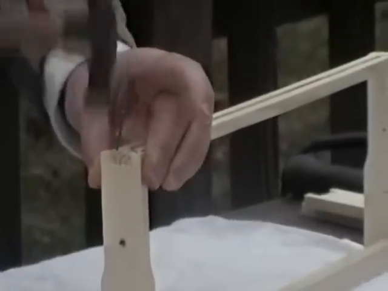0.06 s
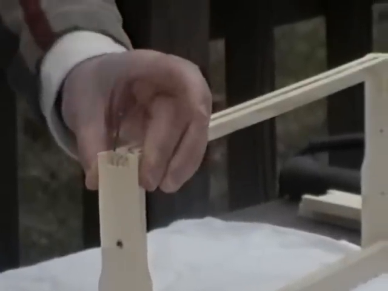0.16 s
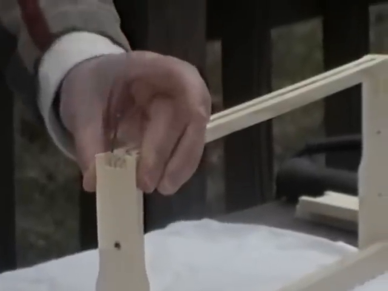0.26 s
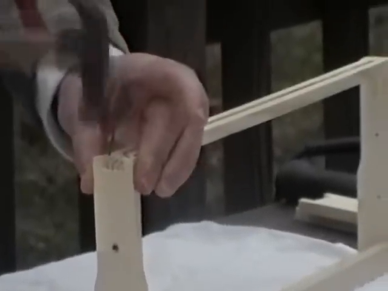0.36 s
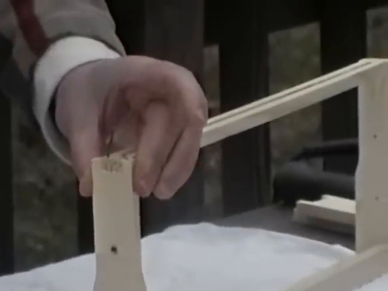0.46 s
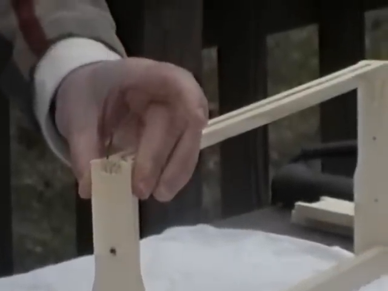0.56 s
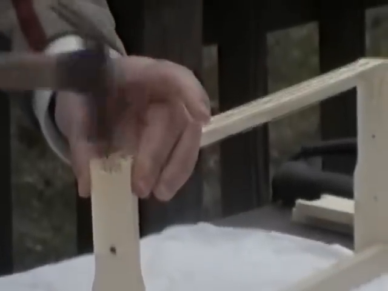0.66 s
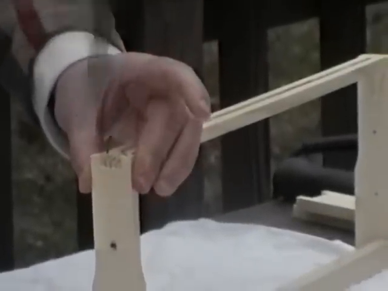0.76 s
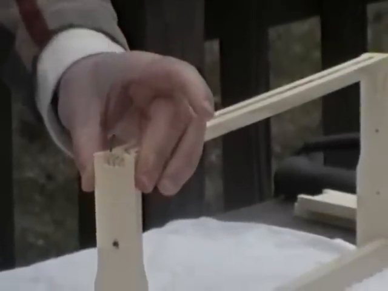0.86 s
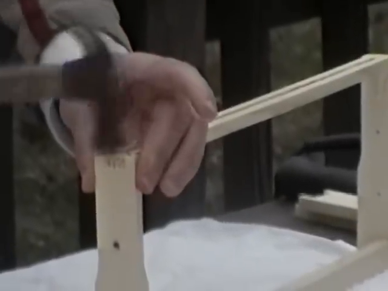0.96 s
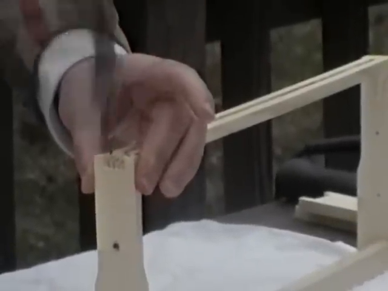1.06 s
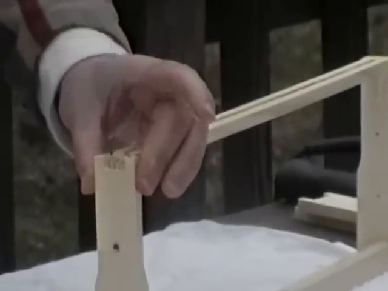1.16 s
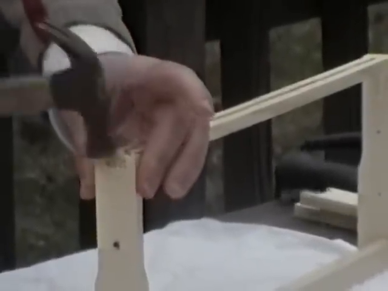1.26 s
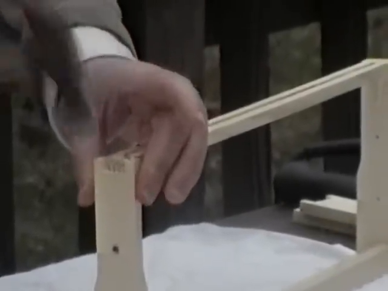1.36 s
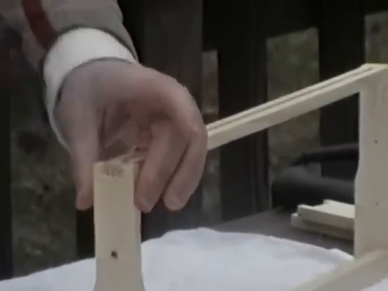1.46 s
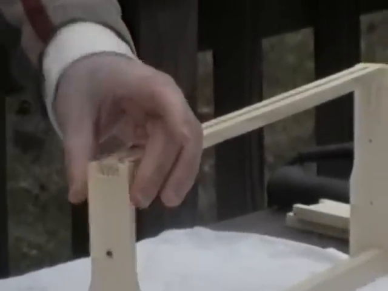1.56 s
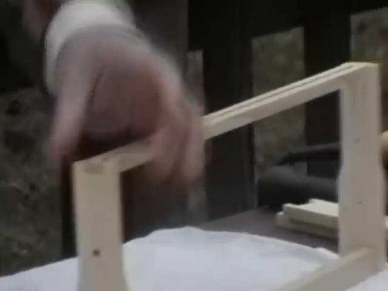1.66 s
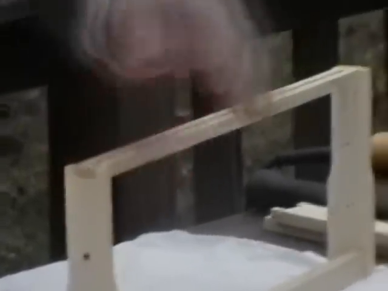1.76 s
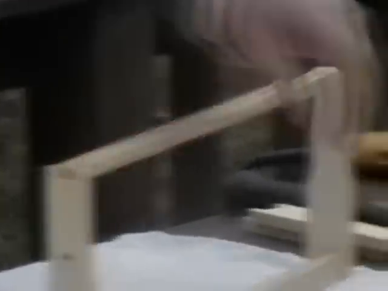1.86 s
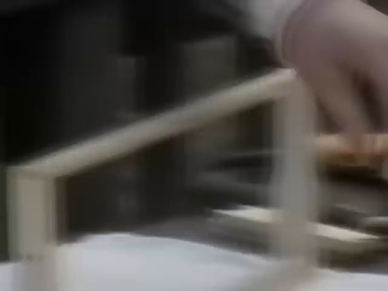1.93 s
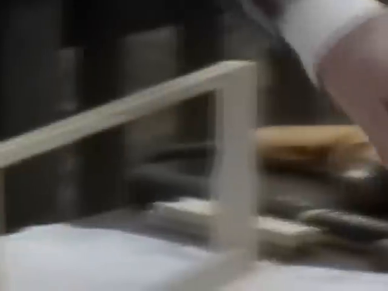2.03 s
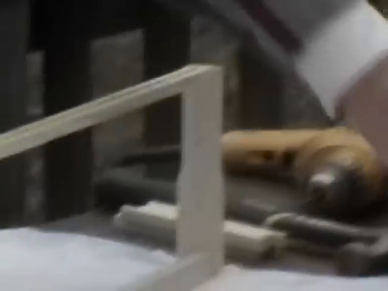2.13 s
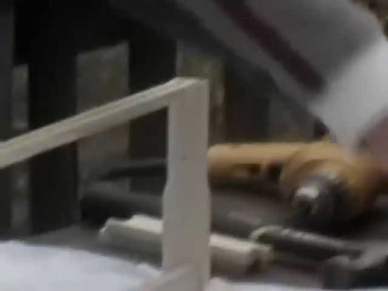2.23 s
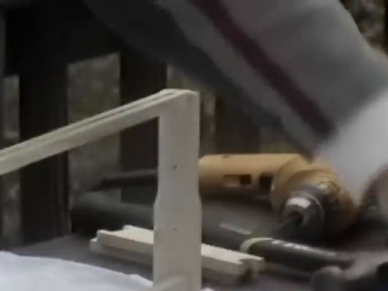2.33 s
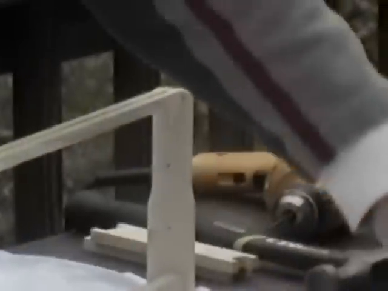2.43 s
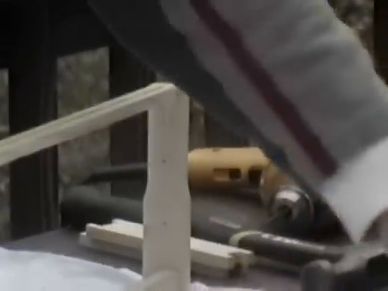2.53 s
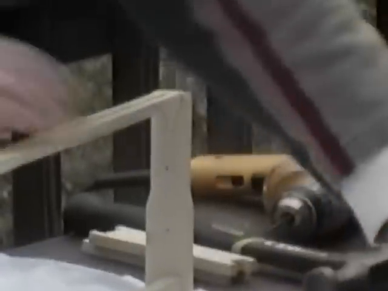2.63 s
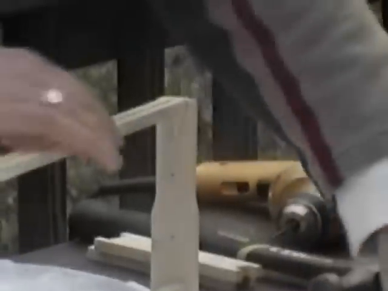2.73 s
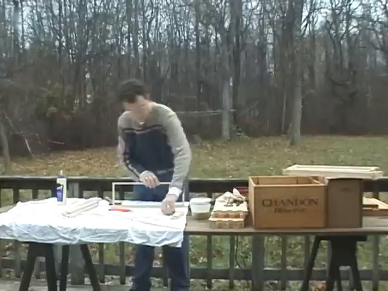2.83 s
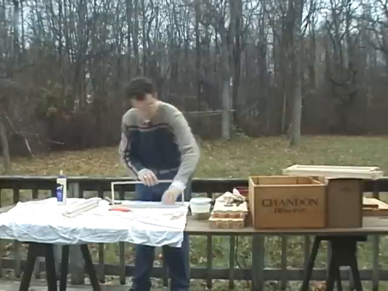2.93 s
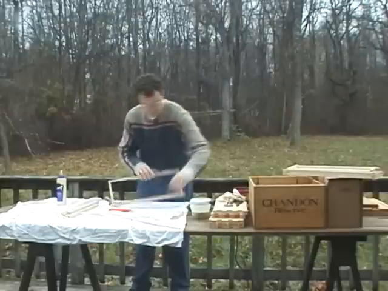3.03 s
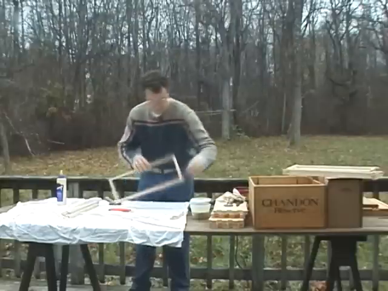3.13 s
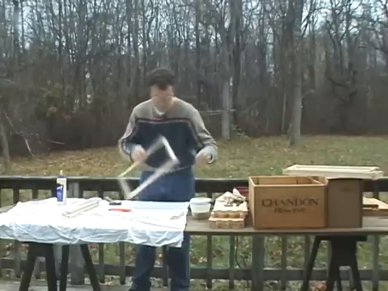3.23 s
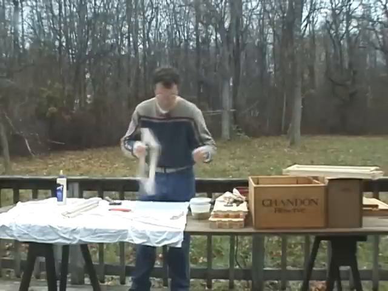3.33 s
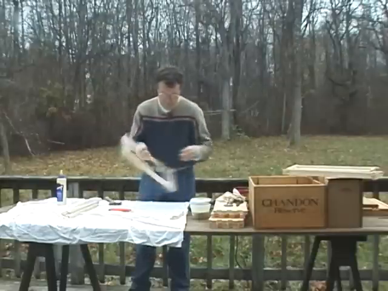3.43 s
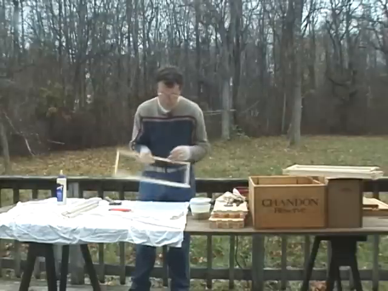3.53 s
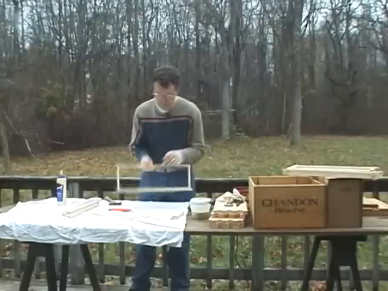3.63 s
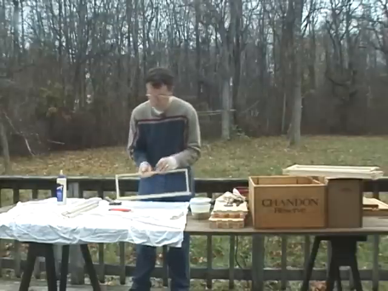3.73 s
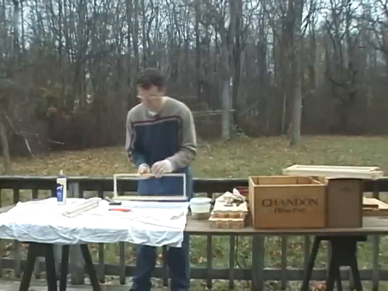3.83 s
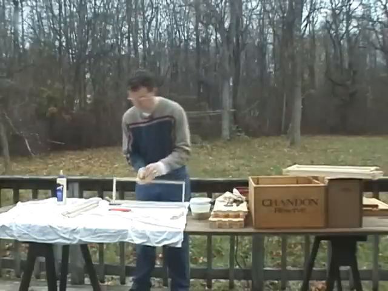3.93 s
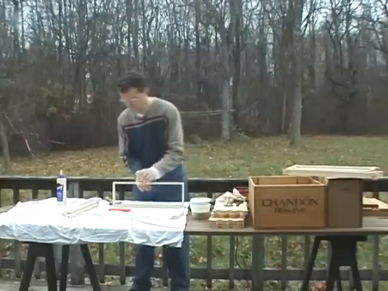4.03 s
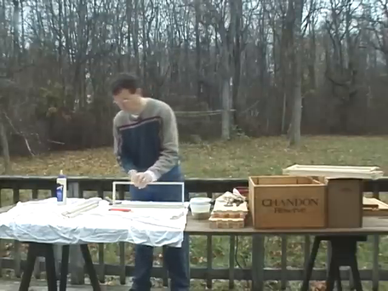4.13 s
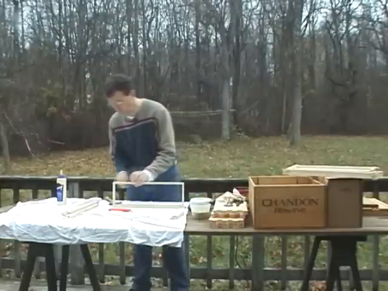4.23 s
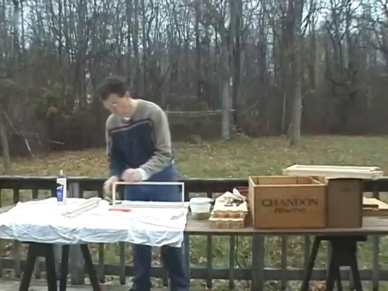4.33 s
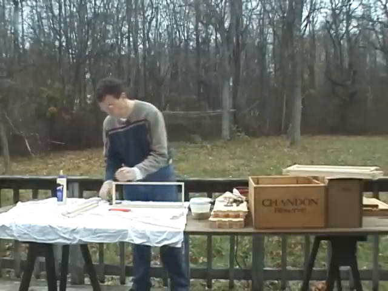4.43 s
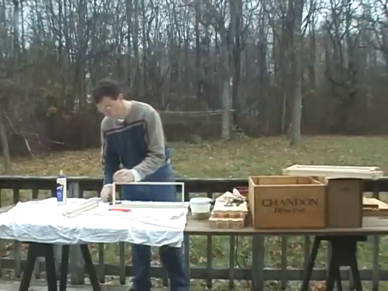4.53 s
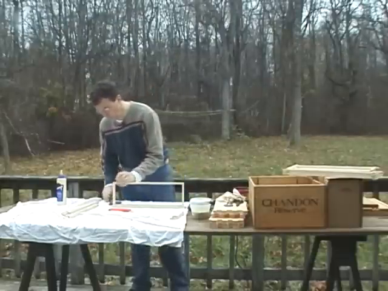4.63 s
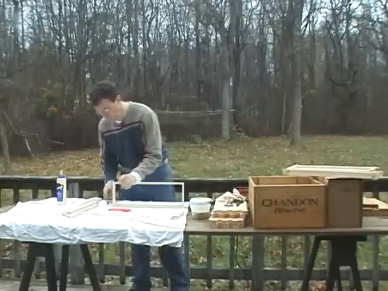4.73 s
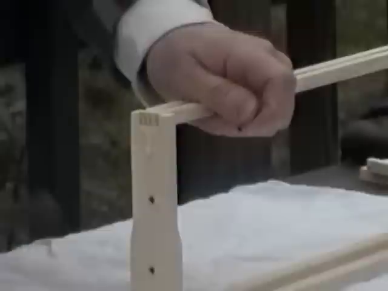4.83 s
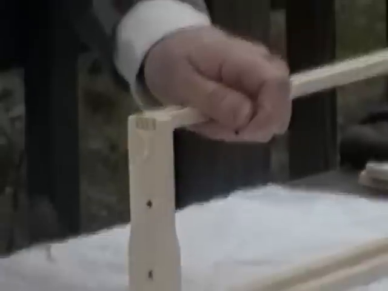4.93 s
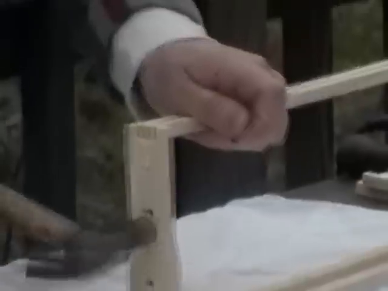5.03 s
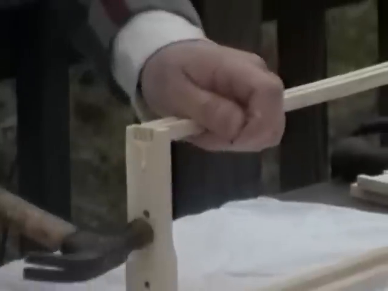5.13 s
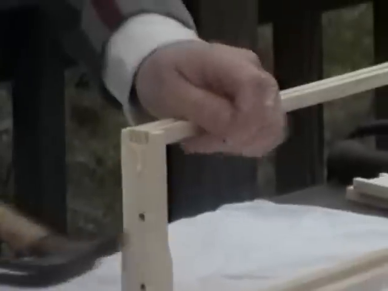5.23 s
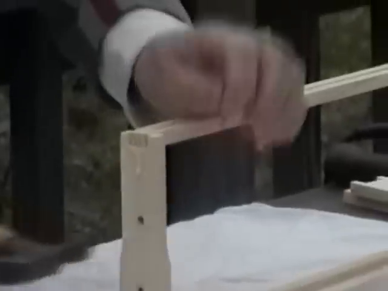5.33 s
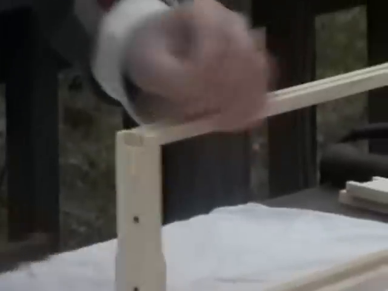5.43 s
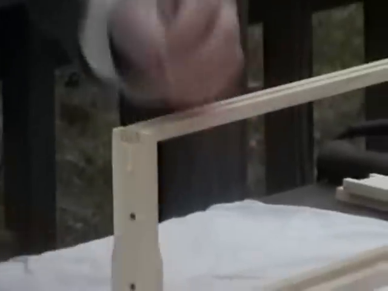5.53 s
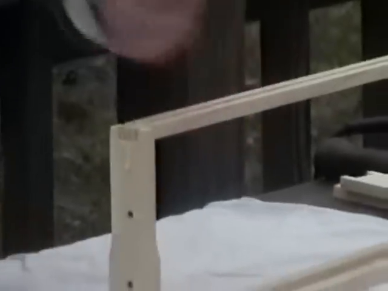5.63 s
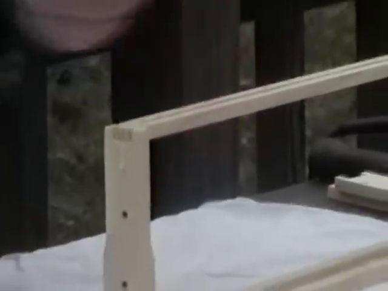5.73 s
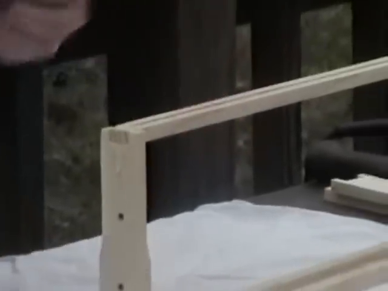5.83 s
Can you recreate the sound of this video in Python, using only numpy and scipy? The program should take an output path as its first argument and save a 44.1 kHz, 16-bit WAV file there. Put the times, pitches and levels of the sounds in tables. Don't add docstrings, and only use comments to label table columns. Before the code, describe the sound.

Outdoor hammering: five evenly spaced steel cracks with woody table boom and nail chatter, later duller clunks and one bright tool drop.

```python
import sys
import numpy as np
from scipy import signal
from scipy.fft import rfft, irfft
from scipy.io import wavfile
from scipy.ndimage import uniform_filter1d

SR = 44100
rng = np.random.default_rng(int(sys.argv[2]) if len(sys.argv) > 2 else 0)


def level_to_linear(level):
    exponent = np.asarray(level, float) / 20
    return 10 ** exponent


def wav_out(sig):
    wavfile.write(sys.argv[1], SR, np.round(np.clip(np.atleast_2d(sig).T, -1, 1) * 32767).astype(np.int16))


N = 259308

BLOWS = [
    (0.0877, -9.5, 4, 460, -13),
    (0.424, -10.5, 8, 440, -8),
    (0.7609, -12.5, 8, 408, -5),
    (1.0669, -11, 8.5, 443, -6),
    (1.349, -11, 5, 301.4, -11.5),
]
# (frequency [Hz], level [dB], T60 [s])
TABLE_MODES = [(149.8, -7.5, 0.9), (287, -6.5, 0.0887), (342, -6.5, 0.1098), (538, -11.5, 0.21),
               (597.6, -9, 0.11), (715, -10, 0.053), (997, -27, 0.071), (997, -23, 0.42), (1181, -18, 0.17),
               (1275, -8.5, 0.27), (1760, -42.5, 0.14), (1630, -33.5, 0.22), (1849, -22.5, 0.22),
               (1955, -26.5, 0.29)]
# (frequency [Hz], level [dB], T60 [s])
FRAME_MODES = [(142, -5, 0.21), (266, -15, 0.2), (461.5, 9.5, 0.11), (508, -11.5, 0.074),
               (763, -12.5, 0.26), (921, 8, 0.05), (1050, -5.5, 0.084), (1162.3, -9, 0.06),
               (1268, -14, 0.11), (1420, -10.5, 0.06)]
# (frequency [Hz], density [dB per Hz])
FIRM_WOOD = [(59, -26.5), (100, -1), (241, -9.5), (290, 0), (328, -4), (521, -5), (572, -9.5), (721, -6),
             (1850, -18), (4000, -54.5), (5200, -63.5), (8800, -120)]
# (frequency [Hz], density [dB per Hz])
SOFT_WOOD = [(59, -37.5), (130, -6.5), (234, -5), (295, 0.5), (414, -6), (581, -0.5), (1300, -7.5),
             (1700, -17), (2500, -35), (4000, -78.5), (5200, -76.5), (8800, -120)]
# (frequency [Hz], density [dB per Hz])
STEEL_CRACK = [(880, -23.5), (1500, 2), (2980, -6), (3730, -4.5), (6910, -21), (8480, -19.5),
               (11500, -35.5), (12700, -51), (16500, -85.5), (22000, -120)]
# (frequency [Hz], density [dB per Hz])
WOOD_CLICK = [(880, -28), (1500, 0.5), (2600, -5.5), (3230, -15), (3770, -16.5), (7000, -38),
              (12000, -62.5), (15600, -86), (22000, -120)]


def along(points, hz):
    f, v = np.transpose(points)
    return np.interp(np.log(hz + 1), np.log(f + 1), v)


def unit(x):
    return x / np.sqrt(np.mean(x ** 2) + 1e-20)


def noise(spectrum, size):
    hz = np.fft.rfftfreq(size, 1 / SR)
    white = rfft(rng.standard_normal(size))
    return unit(irfft(white * level_to_linear(along(spectrum, hz)), size))


def shoulder(t, hold):
    return np.sqrt(t ** 2 + hold ** 2) - np.abs(hold)


def dying(x, decays, hold, size):
    hz, t, z = signal.stft(x, SR, nperseg=size)
    fade = level_to_linear(-60 * shoulder(t, hold) / along(decays, hz)[:, None])
    return signal.istft(z * fade, SR, nperseg=size)[1][:len(x)]


def background():
    # (frequency [Hz], density [dB per Hz])
    air_colour = [(12, -43.5), (20, 5), (86, 1), (113, -5), (147, -2.5), (173, -3), (246, -10),
                  (274, -15.5), (331, -9), (497, -15), (1240, -19.5), (2580, -27.5), (5200, -29),
                  (11400, -31), (12700, -46.5), (16500, -74.5), (22000, -120)]
    # (time [s], rumble level [dB])
    breeze = [
        (0, -54),
        (1.8, -61),
        (2.7, -58),
        (4.6, -59.5),
        (5.88, -63),
    ]
    # (time [s], level [dB])
    shakes = [
        (.43, -31.5),
        (.77, -27.5),
        (1.08, -47.5),
        (1.36, -46.5),
        (2.40, -39.5),
        (4.59, -46),
    ]
    # (frequency [Hz], level [dB])
    whine = (5394.5, -81.5)
    shake_t60_s, shake_hz = 1.3, 75
    hiss_db, duck_db, recover_s = -64, 4, 2.7

    hz, t, z = signal.stft(noise(air_colour, N), SR, nperseg=1024)
    patches = uniform_filter1d(rng.standard_normal(z.shape), size=6, axis=0)
    patches = unit(uniform_filter1d(patches, size=6, axis=1))
    low = 1 / (1 + (hz[:, None] / 500) ** 2)
    shake = sum(level_to_linear(db - 60 * np.abs(t - s) / shake_t60_s) * (t > s) for s, db in shakes)
    shake = shake / (1 + (hz[:, None] / shake_hz) ** 2)
    rumble_db = 20 * np.log10(np.hypot(level_to_linear(np.interp(t, *np.transpose(breeze))), shake))
    after = t - BLOWS[-1][0]
    ducked_db = hiss_db - duck_db * np.exp(-np.abs(after) / recover_s) * (after > 0)
    level_db = low * (rumble_db - 1) + (1 - low) * (ducked_db + 8.5)
    level_db = level_db + (-2.26 + 0.8 * low) * patches
    air = signal.istft(z * level_to_linear(level_db), nperseg=1024)[1][:N]
    return air + level_to_linear(whine[1]) * np.sin(2 * np.pi * whine[0] * np.arange(N) / SR)


def ticks():
    # (time [s], peak level [dB], frequency [Hz], T60 [s])
    clicks = [(2.55, -55, 807, 0.091), (3.07, -61, 2200, 0.0058), (3.096, -50, 1313, 0.013),
              (3.097, -60, 3600, .012), (3.21, -52, 986, 0.024), (3.535, -57, 4670, .01),
              (3.613, -56, 1250, 0.06), (3.665, -51.5, 5690, 0.0071), (4.223, -50, 4260, 0.0089),
              (4.224, -58, 3400, .012)]
    # (time [s], peak level [dB], frequency [Hz], T60 [s])
    pings = [
        (0.4238, -34, 3708, .02),
        (0.7611, -24.5, 8554, 0.015),
        (0.7608, -33.5, 6000, 0.036),
        (1.0668, -30, 6246, .02),
        (1.3493, -27.5, 6426, 0.019),
        (5.1555, -24.5, 4000, 0.016),
        (5.1555, -25, 4940, 0.029),
    ]
    out, t = np.zeros(N + SR), np.arange(3000) / SR
    for s, db, hz, t60 in clicks + pings:
        out[round(s * SR):][:len(t)] += level_to_linear(db - 60 * t / t60) * np.sin(2 * np.pi * hz * t)
    return out[:N]


def wall(x):
    # (frequency [Hz], T60 [s])
    wall_decay = [(60, .8), (300, 0.12), (800, 1.5), (1400, 0.94), (2500, .45), (8000, 0.25)]
    # (frequency [Hz], level [dB])
    wall_colour = [(30, -4.5), (150, -13), (500, -12.5), (1200, -8), (2200, -0.5), (5000, -8),
                   (12000, -19.5)]
    out, step = np.zeros(N + 2 * SR), SR // 3
    for start in range(0, N, step):
        part = x[start:start + step]
        if not part.any():
            continue
        tail = dying(noise(wall_colour, SR), wall_decay, 0, size=512)
        answer = signal.fftconvolve(part, tail / np.linalg.norm(tail))
        out[start + 700:][:len(answer)] += answer
    return out[:N]


def rattle(rows, colour, hold):
    # (frequency [Hz], T60 [s])
    tinkle_decay = [(3000, 0.12), (6000, 0.13), (11000, 0.14)]
    out, t = np.zeros(N + SR), np.arange(2 ** 14) / SR
    for s, db, rise in rows:
        grain = level_to_linear(3.3 * unit(uniform_filter1d(rng.standard_normal(len(t)), size=60)))
        landing = dying(grain * noise(colour, len(t)), tinkle_decay, hold, size=256)
        out[round(s * SR):][:len(t)] += level_to_linear(db) * (1 - np.exp(-t / rise)) * landing
    return out[:N]


def settling_parts():
    # (time [s], level [dB], rise [s])
    settling = [
        (2.31, -53, 0.0089),
        (2.384, -56.5, 0.0057),
        (4.108, -59, .002),
        (5.166, -34, 0.0064),
    ]
    # (frequency [Hz], density [dB per Hz])
    scatter = [(880, -29), (1500, -9.5), (2950, -4), (4110, -13.5), (5010, -17.5), (7050, -29.5),
               (10000, -42.5), (13000, -72), (22000, -120)]
    return rattle(settling, scatter, hold=0.0095)


def loose_nails():
    # (time [s], level [dB], rise [s])
    late_nails = [
        (1.356, -40, .004),
        (1.378, -41, .008),
    ]
    # (frequency [Hz], density [dB per Hz])
    chatter = [(1470, -39), (2500, 4.5), (3360, -9.5), (4970, -4), (6250, -4.5), (6820, -11),
               (11500, -29.5), (12200, -35), (12500, -60), (16200, -93.5), (22000, -120)]
    delay_s, level_db, rise_s = 0.0051, -38, 0.0055
    prompt = [(blow[0] + delay_s, level_db, rise_s) for blow in BLOWS[:-1]]
    return rattle(prompt + late_nails, chatter, hold=0.061)


def ring(modes, t, hold, scatter_db):
    hz, db, t60 = np.transpose(modes)[:, :, None]
    strength = level_to_linear(db + scatter_db * rng.standard_normal(hz.shape))
    life = np.clip(t60, .01, np.minimum(.23, 5 / np.sqrt(hz)))
    tones = strength * level_to_linear(-60 * shoulder(t, hold) / life) * np.sin(2 * np.pi * hz * t)
    return -tones.sum(axis=0) / np.linalg.norm(level_to_linear(db))


def knocks(rows, modes, body, snap, turns, clear_db, hold, rise, hard_hz, lead, boom_db, bite,
           snap_s=.014, drive=0):
    # (frequency [Hz], level [dB], T60 [s])
    leg_modes = [(33, -14, .3), (57, -3, 0.3), (80.3, -0.5, 0.11), (101.9, -4, 0.07)]
    # (frequency [Hz], T60 [s])
    damping = [(100, 0.27), (400, 0.14), (1500, 0.14), (5000, 0.098)]
    flat, grain_db = 0.87, 3
    out, t = np.zeros(N + SR), np.arange(2 ** 14) / SR
    for s, ring_db, punch_db, dent_hz, hard_db in rows:
        fade = np.exp(-(t * dent_hz / turns) ** 3)
        dent = -np.tanh(flat * fade * np.sin(2 * np.pi * dent_hz * t)) / np.tanh(flat)

        grain = level_to_linear(grain_db * unit(uniform_filter1d(rng.standard_normal(len(t)), size=250)))
        clear = level_to_linear(clear_db) * ring(modes, t, hold, scatter_db=3.0)
        dense = dying(grain * noise(body, len(t)), damping, hold, size=256)
        swell = 1 - np.exp(-(t / rise) ** 2)
        wood = level_to_linear(punch_db) * dent + swell * (clear + dense)
        edge = np.clip(hard_hz * level_to_linear(0.49 * (hard_db + 10.5)), 200, 9000)
        wood = signal.sosfilt(signal.butter(2, edge, fs=SR, output="sos"), wood)

        boom = level_to_linear(boom_db + drive * hard_db) * ring(leg_modes, t, hold, scatter_db=1.0)
        crack_db = hard_db - 60 * np.clip(t - 1 / dent_hz, 0, None) / snap_s
        crack = level_to_linear(crack_db) * (1 - np.exp(-t / bite)) * noise(snap, len(t))
        out[round(s * SR):][:len(t)] += level_to_linear(ring_db) * crack
        out[round((s + lead) * SR):][:len(t)] += level_to_linear(ring_db) * (wood + boom)
    return out[:N]


def dropped_tool():
    drop = [
        (5.153, -16, 1.9, 700, 2.7),
        (5.1595, -23.5, 13, 600, -33),
        (5.174, -44, 17, 294, -5),
    ]
    # (frequency [Hz], level [dB], T60 [s])
    tool_modes = [(150, -1, 0.12), (362, -3.5, 0.088), (441.5, 1, 0.14), (700, -4.5, 0.092),
                  (933, 16.5, 0.06), (1450, 4.5, 0.45), (1570, 13, 0.041), (2920, -26, 0.2),
                  (3262, -41.5, 0.08), (3600, -23, 0.15), (4474, -42, 1.6), (5244, -12, 0.023)]
    # (frequency [Hz], density [dB per Hz])
    bright_wood = [(59, -23), (150, -10), (300, -10.5), (514, -2), (654, -5), (1000, -7), (1110, -4),
                   (1650, -19), (1930, -10.5), (3000, -28), (3900, -17.5), (6600, -120)]
    return knocks(drop, tool_modes, bright_wood, STEEL_CRACK, turns=0.89, clear_db=4.0, hold=0.00085,
                  rise=0.0014, hard_hz=4000, lead=0.00084, boom_db=-6.5, bite=0.0015)


def frame_laid_down():
    laydown = [
        (4.0693, -21, 11, 330, -40),
        (4.1058, -16, 12.5, 490, -12),
    ]
    nudge = [
        (4.5845, -53.5, 13.8, 311, -18),
        (4.605, -50, 8, 280, -38),
        (4.645, -54, 7.4, 303, -29),
    ]
    laid = knocks(laydown, FRAME_MODES, SOFT_WOOD, WOOD_CLICK, turns=2.0, clear_db=4.2, hold=0.0029,
                  rise=0.0018, hard_hz=2390, lead=0, boom_db=-30, bite=0.00021, snap_s=0.0043)
    nudged = knocks(nudge, FRAME_MODES, SOFT_WOOD, WOOD_CLICK, turns=2.46, clear_db=-10, hold=0.016,
                    rise=0.0063, hard_hz=1100, lead=0, boom_db=-6, bite=0.00083)
    return laid + nudged


def hammer_laid_down():
    setdown = [
        (2.29, -14.5, 4.7, 520, -11),
        (2.3008, -15.5, 10.5, 493, -9),
        (2.3748, -15, 8.1, 385, -21),
        (2.425, -27.5, 14, 330, -44.5),
        (2.445, -33.5, 11, 320, -54),
    ]
    # (frequency [Hz], level [dB], T60 [s])
    board_modes = [(161.2, -12, 0.022), (290, -4, 0.05), (880, -7.5, 0.11), (1037, 7.5, 0.045),
                   (1530, 9, 0.0085), (2070, -50.5, 0.19), (2200, -44, 0.2), (2464, -31.5, 0.03),
                   (2860, -49, 0.11)]
    return knocks(setdown, board_modes, SOFT_WOOD, WOOD_CLICK, turns=2.0, clear_db=3.0, hold=0.0054,
                  rise=0.0015, hard_hz=4095, lead=0, boom_db=-27, bite=0.00046, snap_s=0.0053)


def skipping_offcut():
    # (time [s], ring level [dB])
    skips = [
        (.5655, -37.5),
        (0.5956, -45),
        (0.609, -44),
        (.64, -49),
    ]
    punch_db, dent_hz, hard_db = 11, 563, -18
    rows = [(s, db, punch_db, dent_hz, hard_db) for s, db in skips]
    return knocks(rows, FRAME_MODES, FIRM_WOOD, WOOD_CLICK, turns=1.3, clear_db=-8.5, hold=.002,
                  rise=.0012, hard_hz=3000, lead=0, boom_db=-6.5, bite=0.0012)


def hopping_frame():
    # (time [s], ring level [dB])
    landings = [(.125, -22), (.22, -38.5), (.47, -23), (.78, -20.5), (.86, -29.5), (.93, -47.5),
                (1.086, -19), (1.17, -30.5), (1.24, -45.5), (1.37, -21.5), (1.398, -19), (1.47, -31)]
    dent_hz, hard_db, punch_db, rebound_db, rebound_s = 321.7, -35.5, -1.5, 23, .02
    rows = []
    for s, db in landings:
        since = min(s - blow[0] for blow in BLOWS if blow[0] < s)
        extra_db = rebound_db * np.exp(-(since / rebound_s) ** 2)
        rows.append((s, db, punch_db + extra_db, dent_hz, hard_db))
    return knocks(rows, TABLE_MODES, FIRM_WOOD, WOOD_CLICK, turns=4.9, clear_db=-11.5, hold=0.01403,
                  rise=0.0014, hard_hz=5120, lead=0, boom_db=-6, bite=.0007)


def seating_slap():
    seated = [
        (1.3535, -18.5, 12, 620, -14),
    ]
    return knocks(seated, TABLE_MODES, FIRM_WOOD, WOOD_CLICK, turns=4.5, clear_db=-5.5, hold=.008,
                  rise=0.0022, hard_hz=5000, lead=0, boom_db=-11.5, bite=.0005)


def hammer_blows():
    return knocks(BLOWS, TABLE_MODES, FIRM_WOOD, STEEL_CRACK, turns=1.4, clear_db=-6.0, hold=0.044,
                  rise=0.0022, hard_hz=6000, lead=0.00074, boom_db=9.5, bite=.0004, drive=1.7)


def scene():
    hammer = hammer_blows() + hopping_frame() + skipping_offcut()
    laid = hammer_laid_down() + frame_laid_down()
    tool = dropped_tool()
    nails = loose_nails()
    parts = settling_parts()
    to_wall = level_to_linear(-34) * hammer + level_to_linear(-39.5) * laid + level_to_linear(-45.5) * tool
    to_wall += level_to_linear(-20) * nails + level_to_linear(-23.0) * parts
    direct = hammer + seating_slap() + laid + tool + nails + parts
    return (direct + wall(to_wall) + ticks() + background())[None]


def roll_off(x):
    return signal.sosfilt(signal.butter(12, 12830, fs=SR, output="sos"), x)


def record(dry):
    mic = signal.sosfilt(signal.butter(2, 26, "high", fs=SR, output="sos"), dry)
    soft = mic / (1 + np.abs(mic / .95) ** 6) ** (1 / 6)
    cut = signal.sosfilt(signal.butter(14, 11900, fs=SR, output="sos"), soft)
    return roll_off(cut)


dry = scene()
out = record(dry)
wav_out(out)
```